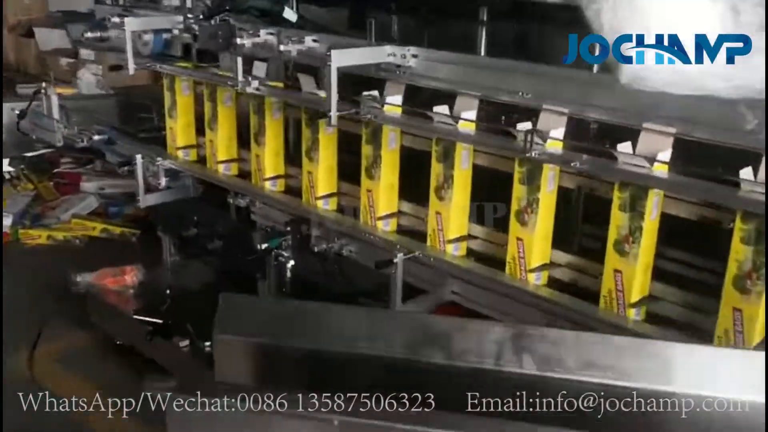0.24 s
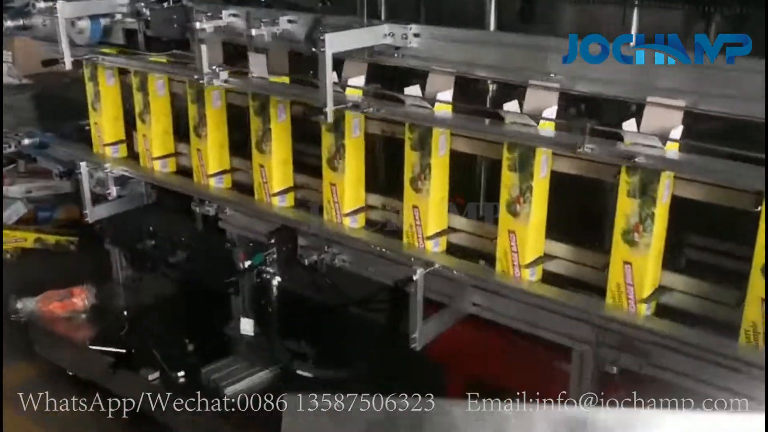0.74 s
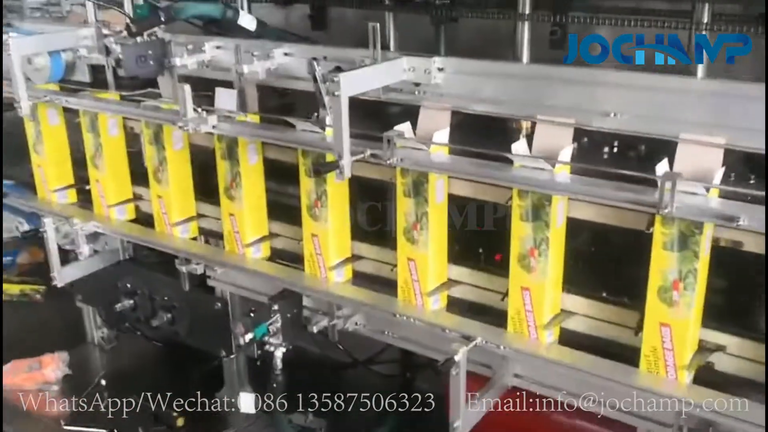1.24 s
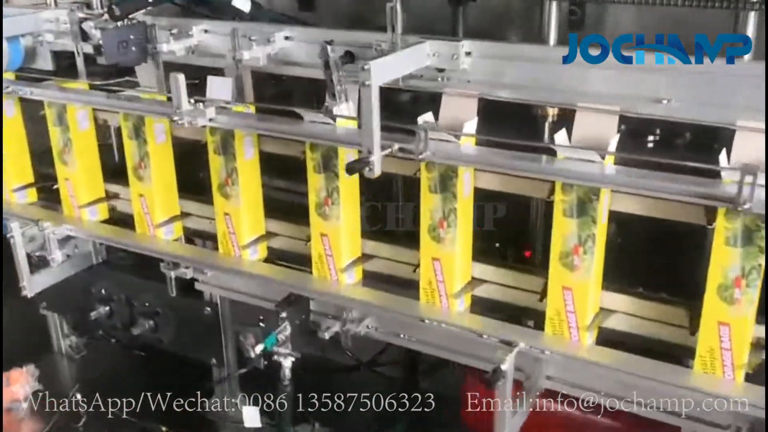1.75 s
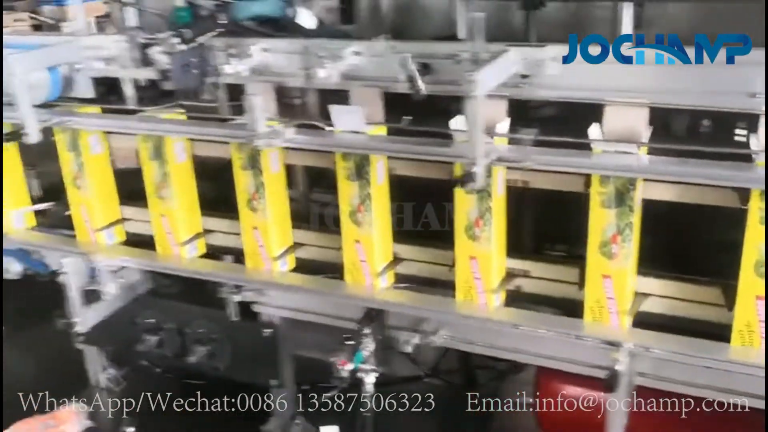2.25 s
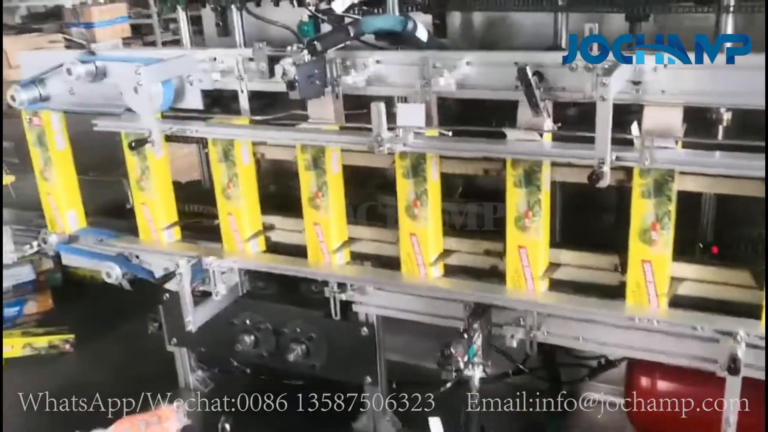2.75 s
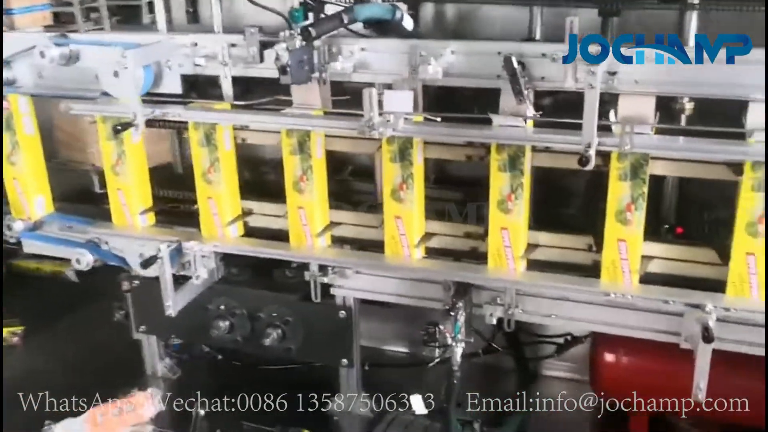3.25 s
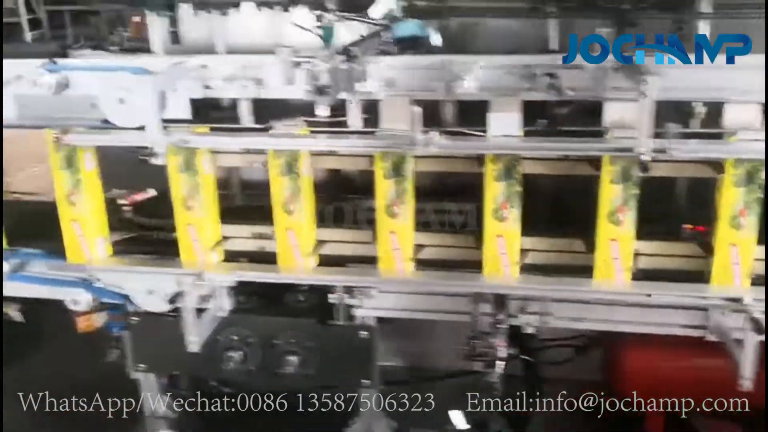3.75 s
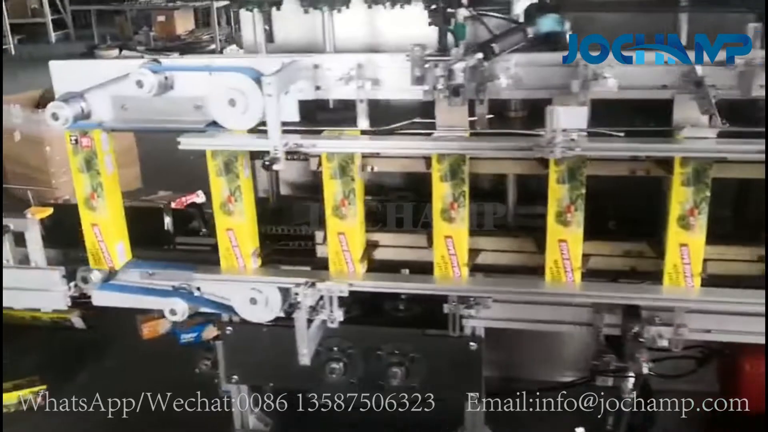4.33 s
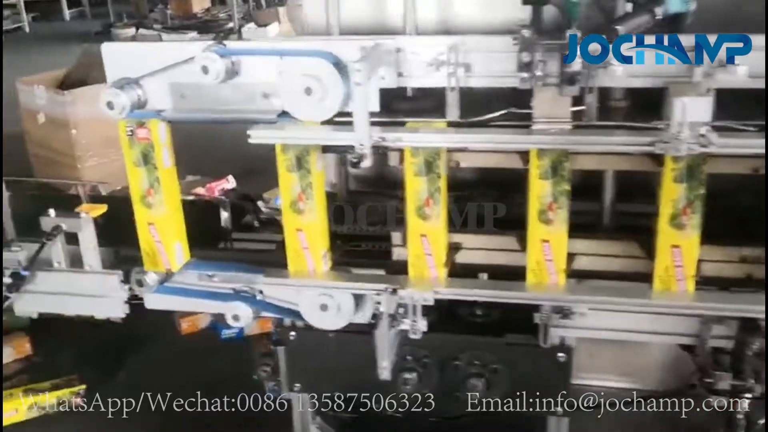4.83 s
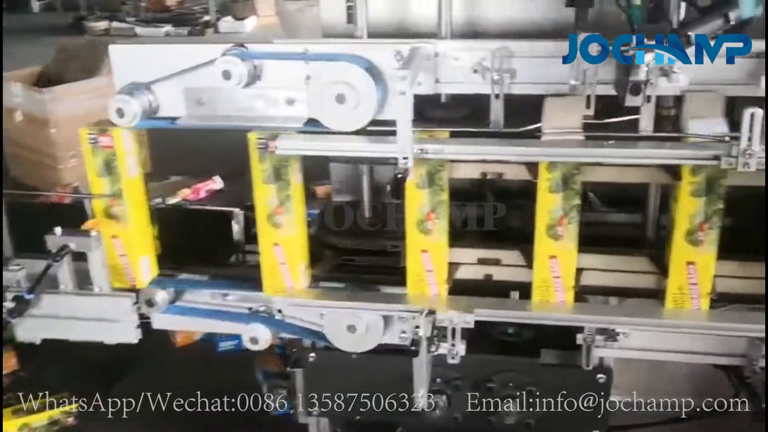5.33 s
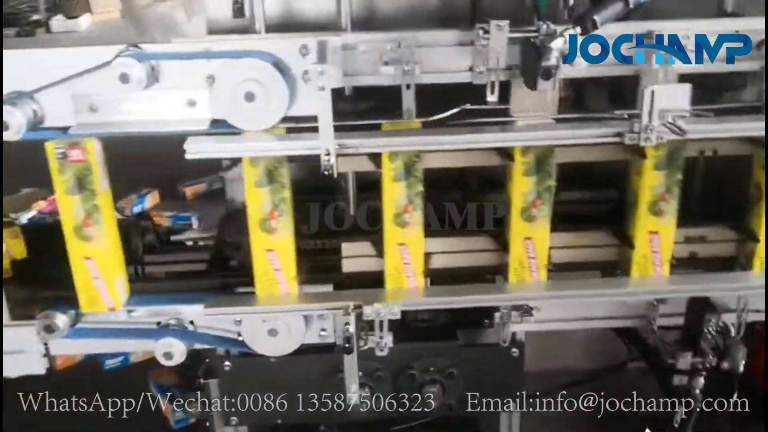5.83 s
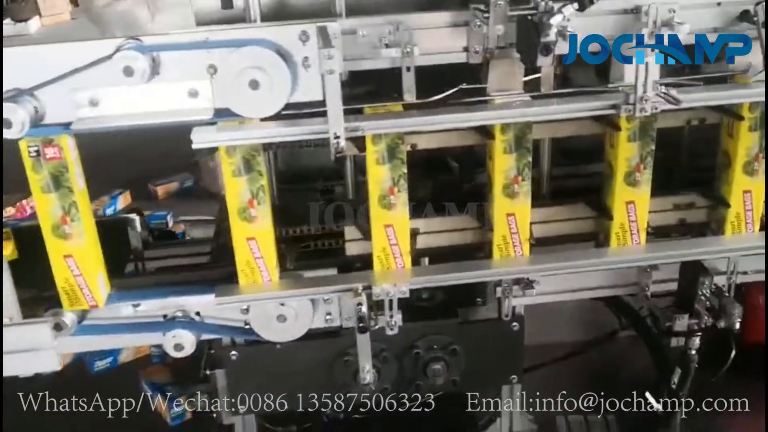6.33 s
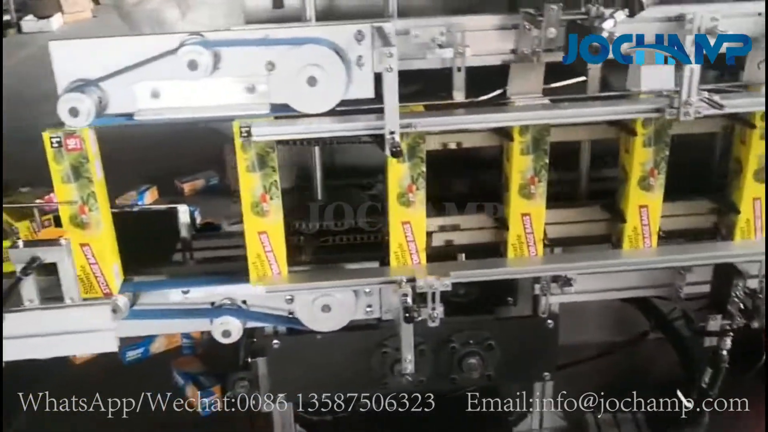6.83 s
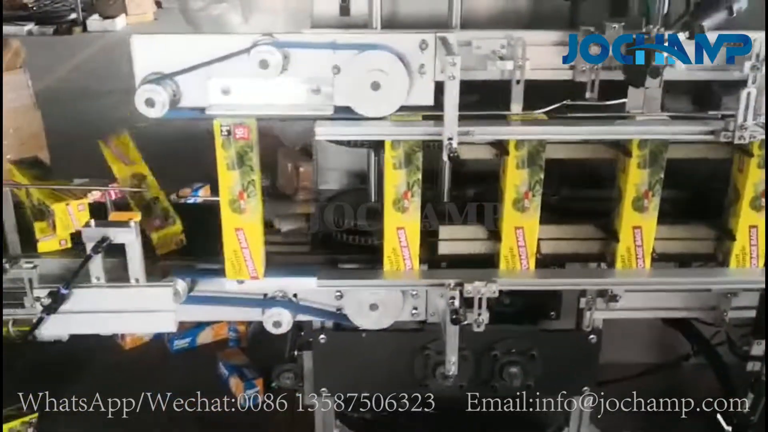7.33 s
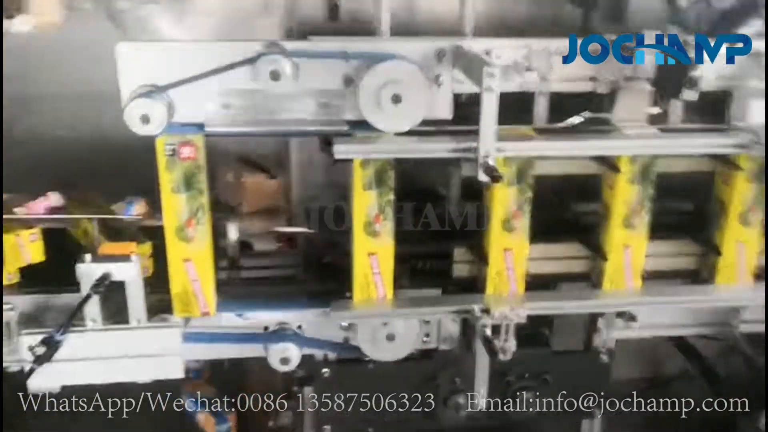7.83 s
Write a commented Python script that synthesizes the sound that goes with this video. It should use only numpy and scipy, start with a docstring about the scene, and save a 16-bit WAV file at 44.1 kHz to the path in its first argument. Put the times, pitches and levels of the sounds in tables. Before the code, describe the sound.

A packaging machine runs close to a phone in a factory hall. Every 1.6 seconds the drive rumbles and whines for about a second, chain rattling and cardboard boxes scraping and knocking on steel guides. Small metal clanks start many strokes; valves spit and exhausts whistle shortly after. Later strokes add a spluttering air jet ending in a metal clack. Motors and fans hum through the pauses.

```python
"""In a factory hall, a cartoning machine moves its conveyor on every 1.6 s, heard close by through a phone.
On each stroke the drive rumbles and whines (filtered grains of noise and steady tones), the chain rattles
and cartons scrape and knock along steel guides (noise through resonances).
Valves spit and exhausts whistle with short noise bursts; a jet blows as a cylinder clacks home.
Behind it all, wavering tones and coloured noise make motors and fans that carry on in the pauses."""
import sys
import numpy as np
from scipy import signal
from scipy.fft import rfft, irfft, next_fast_len
from scipy.io import wavfile

SR = 44100
rng = np.random.default_rng(int(sys.argv[2]) if len(sys.argv) > 2 else 0)


def transcribe(signal):
    """Save signal, clipped to [-1, 1], as a 16-bit WAV file at the path in sys.argv[1]."""
    frames = np.atleast_2d(signal).T
    limited = np.clip(frames, -1, 1)
    pcm = np.round(limited * 32767).astype(np.int16)
    wavfile.write(sys.argv[1], SR, pcm)


N = 356769
TIME = np.arange(N) / SR
SIZE = next_fast_len(N + SR)  # room for filters to ring out
FREQ = np.maximum(np.arange(SIZE // 2 + 1) * SR / SIZE, 1)

# conveyor strokes: (start [s], frame rumble [dB], starting lurch [dB], chain rattle [dB],
# carton scrape [dB], gear whine [dB])
STROKES = [(0.03, -31.5, -34, -35.5, -58, -42), (1.635, -32.5, -25.5, -34, -37, -38),
           (3.26, -30.5, -48, -33, -40.5, -39), (4.87, -31.5, -35.5, -34, -35, -41),
           (6.48, -30, -25.5, -32.5, -34, -41.5)]
# the motor pulls for RUN_S on every stroke; cartons are shoved hardest during SHOVE_S
RUN_S, SHOVE_S = 1, 0.5
DRIVE_HZ = 145.83


def undb(db):
    """Turn decibels into gain."""
    return 10 ** (np.asarray(db) / 20)


def unit(x):
    """Scale to an average strength (rms) of 1."""
    return x / np.sqrt(np.mean(np.abs(x) ** 2))


def noise():
    """Unrelated white noise for two channels."""
    return rng.standard_normal((2, N))


def walk(rate):
    """Random wandering of rms 1, in straight lines between new values drawn rate times a second."""
    steps = rng.standard_normal(4096)
    return unit(np.interp(TIME * rate, np.arange(len(steps)), steps))


def colour(points):
    """Frequency response through (frequency [Hz], level [dB]) points, reacting only after its input."""
    hz, db = np.transpose(points)
    gain = undb(np.interp(np.log(FREQ), np.log(hz), db))
    # folding the cepstrum (the spectrum of the log gain) forward in time makes the filter causal
    cepstrum = irfft(np.log(gain), SIZE)
    cepstrum[1:SIZE // 2] *= 2
    cepstrum[SIZE // 2 + 1:] = 0
    return np.exp(rfft(cepstrum))


def resonance(hz, width):
    """Frequency response of one way an object likes to vibrate (a mode); width in Hz."""
    return 1 / (1 + 1j * (FREQ / hz - hz / FREQ) * hz / width)


def through(x, response):
    """Filter a sound by a frequency response."""
    return irfft(rfft(x, SIZE) * response, SIZE)[..., :N]


def band(x, hz, q):
    """One resonance for a single event, scaled so that white noise keeps its level."""
    b, a = signal.iirpeak(min(hz, SR / 3), max(q, 1 / 2), fs=SR)
    return signal.lfilter(b, a, x) / np.sqrt(b[0])


def whistle(x, hz, width_hz):
    """Noise held in a steep, narrow resonance."""
    q = hz / width_hz
    twice = band(band(x, hz, q), hz, q)
    return twice / np.sqrt(SR / (np.pi * width_hz) / 2)


def decay(age, t60):
    """Fading that falls by 60 dB in t60 seconds."""
    return np.exp(-np.log(1000) * age / t60)


def burst(t60, crack=0):
    """Half a second of noise that dies away, with an extra crack in its first milliseconds."""
    age = TIME[:SR // 2]
    fade = decay(age, max(t60, 1e-3)) + crack * np.exp(-age / 0.002)
    return rng.standard_normal((2, len(age))) * fade / np.sqrt(1 + crack ** 2)


def ping(hz, t60):
    """Half a second of one mode ringing down, alike in both channels."""
    age = TIME[None, :SR // 2]
    return np.sin(2 * np.pi * hz * age) * decay(age, max(t60, 1e-3))


def onset(rise_s):
    """Half a second of gain that rises softly from 0 towards 1."""
    return 1 - np.exp(-TIME[:SR // 2] / rise_s)


def add(track, s, sound):
    """Mix a short sound in at time s."""
    start = max(int(s * SR), 0)
    track[:, start:start + sound.shape[1]] += sound[:, :N - start]


def grains(rate, scatter_db):
    """Dense tiny impacts at random moments; more scatter makes their sizes less equal."""
    size = undb(scatter_db * np.minimum(rng.exponential(size=N), 4))
    hits = rng.random(N) < rate / SR
    return unit(noise() * size * hits)


def room(x, early_db, tail_db, early_t60=0.16):
    """Quick reflections off the machine's panels, together with the longer tail of the hall."""
    age = TIME[:SR]
    hall_t60 = 0.56  # s
    early, tail = rng.standard_normal((2, 2, SR)) * (age > .002)
    early = unit(early * decay(age, early_t60))
    tail = unit(tail * decay(age, hall_t60) * (1 - np.exp(-age / 0.0076)))
    echoes = (undb(early_db) * early + undb(tail_db) * tail) / np.sqrt(SR)
    return x + through(x, rfft(echoes, SIZE))


def tone(hz, waver, drift_hz, rate):
    """A steady tone that drifts in pitch and wavers differently in each channel."""
    phase = 2 * np.pi * np.cumsum(hz + drift_hz * walk(6)) / SR
    channels = []
    for _ in range(2):
        strong = (1 + waver * walk(rate)) * np.sin(phase)
        channels.append(strong + waver * walk(rate) * np.cos(phase))
    return unit(np.array(channels))


def clatter(per_s, low_hz, high_hz, t60, scatter_db):
    """Many loose parts, each ringing briefly at its own pitch."""
    out, age = np.zeros((2, N)), TIME[:SR // 10]
    for when, pitch, size, turn in rng.random((int(per_s * N / SR), 4)):
        hz = low_hz * (high_hz / low_hz) ** pitch
        # the second channel starts elsewhere in the cycle
        swing = np.sin(2 * np.pi * (hz * age + np.array([[0], [turn]])))
        ring = swing * decay(age, t60) * (1 - np.exp(-age * hz))
        add(out, when * N / SR, undb(scatter_db * size) * ring)
    return unit(room(out, early_db=-13.0, tail_db=-2.0))


def stroke(levels_db, attack_s, hold_s, sag_db_per_s, release_db_per_s):
    """Gain over time: each stroke builds up, sags (or grows, if negative) while it runs, then dies away."""
    gain = 0
    for (start, *_), db in zip(STROKES, levels_db):
        age = np.maximum(TIME - start, 0)
        sag_db = sag_db_per_s * np.minimum(age, hold_s)
        release_db = release_db_per_s * np.maximum(age - hold_s, 0)
        gain = gain + np.minimum(age / attack_s, 1) ** 1.11 * undb(db - sag_db - release_db)
    return gain


def hall():
    """Fans and motors always run; one fan sinks as the drive pulls and the phone moves on; a bearing whirrs."""
    # colour of the hall's air: (frequency [Hz], level [dB])
    hall_colour = [(20, -23), (40, -7.5), (80, -7.5), (150, -3), (230, -7), (350, -12.5), (550, -20.5),
                   (780, -16), (1300, -16), (2100, -13.5), (2800, -15.5), (3600, -22), (6000, -39),
                   (9000, -104)]
    # colour of the high hiss: (frequency [Hz], level [dB])
    hiss_colour = [(3000, -25), (5500, -4), (7300, 0), (7900, -3), (8500, -21), (15000, -21)]
    # ducts and panels ringing: (frequency [Hz], width [Hz], level [dB])
    duct_modes = [(1930, 60, -10), (2320, 58, -7), (2740, 80, 1), (3070, 80, -8), (3700, 61, -1),
                  (4600, 200, -9)]
    # steady motors: (frequency [Hz], level [dB])
    motor_tones = [(100, -59.5), (146, -56), (167, -53.5), (300, -59), (336, -57.5), (1750, -56),
                   (2013, -56), (2277, -64), (3160, -56)]

    ducts = 1 + sum(undb(db) * resonance(hz, width) for hz, width, db in duct_modes)
    air = unit(through(noise(), colour(hall_colour) * ducts)) * undb(-40.5 + 1.7 * walk(6.1))
    hiss = unit(through(noise(), colour(hiss_colour))) * undb(-52.0)

    # the same short piece of noise comes back on every shaft turn
    shaft_hz = 24.15
    one_turn = (TIME % (1 / shaft_hz) * SR).astype(int)
    whirr = unit(through(noise()[:, one_turn], resonance(2170, 490) ** 2))
    whirr = whirr * undb(-49.5 + 0.53 * walk(15.0))
    hum = sum(undb(db) * tone(hz, waver=0.09, drift_hz=0.69, rate=6.6) for hz, db in motor_tones)

    load = stroke(np.zeros(len(STROKES)), attack_s=0.71, hold_s=1.22, sag_db_per_s=-3, release_db_per_s=38)
    # a steady fade of 0.55 dB per second, and a dip of 5 dB for each unit of load
    fan_db = -48.5 - .55 * TIME - 5 * load
    fan = undb(fan_db) * tone(815, waver=.15, drift_hz=.8, rate=5)
    return air + hiss + whirr + hum + fan


def drive():
    """The frame lurches as the chain takes up, then rumbles with its links and jolts; the motor drones."""
    # colour of the machine frame: (frequency [Hz], level [dB])
    frame_colour = [(20, -41.5), (45, -1), (65, -19.5), (85, 1), (102, -5), (135, 6.5), (185, 4.5),
                    (240, -0.5), (320, -3), (480, -12.5), (900, -71.5)]
    # the frame jolts and booms as the load shifts: (time [s], level [dB], frequency [Hz])
    jolt_events = [(0.715, -25.5, 139), (0.85, -23.5, 137.4), (2.65, -26, 142), (3.44, -27, 155),
                   (4.099, -34, 160), (5.071, -28, 159), (5.74, -24.5, 145), (6.969, -26.5, 188.5)]

    _, rumble_db, lurch_db, _, _, _ = np.transpose(STROKES)
    running = stroke(rumble_db, attack_s=0.19, hold_s=RUN_S, sag_db_per_s=0.65, release_db_per_s=30.5)
    lurch = stroke(lurch_db, attack_s=0.17, hold_s=SHOVE_S, sag_db_per_s=12.0, release_db_per_s=79)
    rumble = unit(through(grains(rate=1500, scatter_db=1), colour(frame_colour))) * np.hypot(running, lurch)
    motor = undb(-13) * running * tone(DRIVE_HZ, waver=0.69, drift_hz=1.66, rate=23)
    jolts = np.zeros((2, N))
    for s, db, hz in jolt_events:
        add(jolts, s, undb(db) * ping(hz, t60=0.23) * onset(0.0019))
    return rumble * undb(-2.0) + motor + jolts


def gearing():
    """Gears whine under load and sink in pitch as they coast; pressed hard, overtones near the ring sing."""
    # overtones of the gearing: (multiple of the drive frequency [-], level [dB])
    gear_orders = [(3, -15), (7, -14), (8, -12), (11, -7), (12, -1.5), (13, -10), (14, -17), (18, -21)]
    # the gearing sings out when it is pressed hardest: (start [s], length [s], level [dB])
    sing_events = [(0.53, 0.11, -36), (2.024, 0.63, -36.5), (7.335, .12, -39)]
    housing_hz, sing_width_hz = 1755, 170
    coast_db, coast_slowing = -46.5, .004  # whine left as gears run on; largest share of speed lost

    load = stroke(np.transpose(STROKES)[5], attack_s=0.335, hold_s=RUN_S,
                  sag_db_per_s=2.5, release_db_per_s=71.5)
    coast = stroke(np.full(len(STROKES), coast_db), attack_s=1.0, hold_s=RUN_S,
                   sag_db_per_s=-1, release_db_per_s=29)
    speed = 1 - coast_slowing * (1 - np.minimum(load / undb(-44), 1))

    press = 0
    for s, length, db in sing_events:
        edge = np.minimum(TIME - s, s + length - TIME)  # distance to the nearer end
        press = press + undb(db) * np.clip(edge / 0.023, 0, 1)
    press = press * undb(2.2 * walk(70))  # flutter
    whine = np.hypot(load * undb(1.6 * walk(11)), coast)

    gears = 0
    for k, db in gear_orders:
        nearness = 1 / np.hypot(1, (k * DRIVE_HZ - housing_hz) / sing_width_hz)
        overtone = tone(k * DRIVE_HZ * speed, waver=.28, drift_hz=4, rate=45)
        gears = gears + undb(db) * np.hypot(whine, press * nearness) * overtone
    housing = undb(-1.5) * unit(whistle(noise(), housing_hz, width_hz=66))
    return gears + housing * load


def clanks():
    """Small steel parts ring with a close pair of modes and a weaker overtone; brief bright clicks sound too."""
    # small steel parts clanking: (time [s], level [dB], frequency [Hz], 60 dB decay [s])
    clank_events = [(0.1321, -9.5, 2065, 0.026), (0.166, -20, 789, 0.11), (0.23, -25.5, 1160, .2),
                    (0.265, -29.5, 1150, 0.52), (1.729, -18, 2340, 0.1), (1.784, -24, 2260, 0.12),
                    (1.803, -17, 2290, 0.1), (1.879, -19, 2620, 0.079), (1.955, -31, 1895, 0.19),
                    (2.456, -18.5, 2750, 0.044), (2.68, -26, 2120, 0.1), (2.694, -25, 2440, .1),
                    (3.392, -22, 1640, 0.045), (3.415, -18, 1270, .06), (4.894, -25, 1650, 0.046),
                    (4.989, -18.5, 1670, 0.086), (5.02, -23, 1156, 0.13), (6.559, -24, 2170, 0.1),
                    (6.612, -19, 1510, 0.055), (6.666, -15.5, 2280, 0.058)]
    # brief bright clicks of noise: (time [s], level [dB], frequency [Hz], 60 dB decay [s])
    click_events = [(0.1322, -17, 3500, .022), (3.472, -41, 12000, .008), (5.5355, -22, 4500, .028)]

    out = np.zeros((2, N))
    contact = onset(0.00046)
    for s, db, hz, t60 in clank_events:
        partner = undb(2) * ping(1.07 * hz, t60 / 2)
        overtone = undb(-27) * ping(2.0 * hz, t60 / 2)
        add(out, s, undb(db) * contact * (ping(hz, t60) + partner + overtone))
    for s, db, hz, t60 in click_events:
        add(out, s, undb(db) * whistle(burst(t60), hz, width_hz=.8 * hz))
    return undb(-5.0) * room(out, early_db=-16.5, tail_db=-6.5)


def conveyor(steel):
    """The chain rattles in its steel guides while cardboard rubs along them and now and then squeaks."""
    # colour of the chain: (frequency [Hz], level [dB])
    chain_colour = [(200, -11.5), (400, -9.5), (560, 0), (760, 0), (1200, -6.5), (1700, 1.5), (2300, -28.5),
                    (4000, -6), (8000, -55)]
    # colour of rubbing cardboard: (frequency [Hz], level [dB])
    card_colour = [(900, -25), (1600, 3), (2200, 10), (2800, -6), (3800, 2), (5000, 0.5), (7500, 1.5),
                   (8600, -124), (15000, -20)]
    # cardboard squeaking on the guides: (time [s], level [dB], frequency [Hz], 60 dB decay [s],
    # width [Hz], swelling time [s])
    squeak_events = [(2.674, -35, 2150, 0.095, 370, 0.0055), (5.908, -32.5, 2290, 0.15, 420, 0.027),
                     (6.556, -57, 6930, 0.64, 110, .005), (6.664, -42, 7050, 0.07, 130, .002),
                     (6.718, -46, 6860, 0.051, 110, .003)]

    _, _, _, rattle_db, scrape_db, _ = np.transpose(STROKES)
    shake = stroke(rattle_db, attack_s=0.11, hold_s=RUN_S, sag_db_per_s=7.0, release_db_per_s=42)
    shove = stroke(scrape_db, attack_s=0.21, hold_s=SHOVE_S, sag_db_per_s=6.5, release_db_per_s=24)
    # cartons slide under the shove and on after it
    slide = stroke(np.full(len(STROKES), -40.5), attack_s=0.02, hold_s=1.0,
                   sag_db_per_s=6.5, release_db_per_s=80)
    rub = np.sqrt(shove ** 2 + slide ** 2 + undb(-45.0) ** 2)  # the belts keep rubbing in the pauses

    rattle = through(grains(rate=700, scatter_db=1.5), colour(chain_colour) * steel)
    rattle = unit(room(rattle, early_db=6.5, tail_db=1)) * shake * undb(1.5 + 1.68 * walk(35))
    scrape = through(grains(rate=1500, scatter_db=0.0), colour(card_colour) * steel)
    scrape = unit(room(scrape, early_db=0.0, tail_db=-5.5)) * rub * undb(1 + 1.7 * walk(45))

    # loose parts chatter mostly when the chain shakes hard
    loose = clatter(per_s=750, low_hz=750, high_hz=3200, t60=.032, scatter_db=18)
    loose = loose * shake * (shake / shake.max()) ** 1.3 * undb(1.5)

    squeaks = np.zeros((2, N))
    for s, db, hz, t60, width, swell_s in squeak_events:
        add(squeaks, s, undb(db) * whistle(burst(t60), hz, width) * onset(swell_s))
    return rattle + scrape + loose + room(undb(13.0) * squeaks, early_db=-26, tail_db=-15)


def pneumatics():
    """Valves spit, the jet coughs, snaps open and cuts off, and each exhaust pops and whistles in its port."""
    # valves switching: (time [s], level [dB], 60 dB decay [s])
    valve_events = [(0.342, -26.5, 0.15), (0.834, -27.5, 0.1), (0.884, -31.5, 0.22), (1.9576, -20, 0.1),
                    (2.4548, -28, 0.26), (3.5383, -25, 0.11), (4.0062, -30, 0.39), (4.056, -25, 0.14),
                    (4.107, -26, 0.16), (5.137, -25, 0.075), (5.68, -25, 0.094), (5.7358, -27, 0.063),
                    (6.756, -29, 0.065), (7.255, -27.5, 0.26), (7.307, -24.5, 0.16), (7.3618, -27.5, 0.087)]
    # cylinders venting: (time [s], level [dB], whistle frequency [Hz], whistle over the hiss [dB],
    # opening time [s])
    exhaust_events = [(0.493, -14, 7200, -5, 0.0077), (0.985, -11.5, 7300, -8.5, 0.0064),
                      (2.113, -15.5, 7060, -5.5, 0.0016), (2.606, -14, 7240, -6.5, 0.0018),
                      (4.206, -13.5, 7100, -7, 0.00098), (5.8319, -18.5, 7640, -6, 0.000086),
                      (7.4598, -17, 7100, 2, .0001)]
    # the air jet: (time [s], length [s], level [dB], time until the nozzle is fully open [s])
    jet_events = [(3.537, 0.23, -31, 0.02), (5.143, 0.18, -28.5, 0.016), (6.759, 0.2, -29, 0.024)]
    # resonances of the jet's nozzle: (frequency [Hz], width [Hz], level [dB])
    nozzle_modes = [(2330, 300, -7), (3100, 250, -6), (3750, 300, -5), (6120, 260, 10), (7450, 500, -5),
                    (8800, 250, 4), (9250, 300, 5)]
    # colours of the jet, a valve's spit and a vent's hiss: (frequency [Hz], level [dB])
    air_colour = [(300, -22.5), (750, 4.5), (1200, 0.5), (2500, 7), (3600, -1), (5500, -2.5), (6100, -6.5),
                  (6700, 1), (7800, 4.5), (8400, -10), (9400, -17), (10500, -22), (13000, -8.5),
                  (15000, -14)]
    spit_colour = [(500, -4), (2000, 11), (3000, 5.5), (5000, 1.5), (7900, 3), (8600, -22), (11000, -15),
                   (15000, -15.5)]
    vent_colour = [(500, -4.5), (2000, 7), (3500, -1.5), (6000, -4), (7900, 4), (8700, -27.5), (10000, -16),
                   (12000, -9), (15000, -17)]
    splutter_db = 3.2

    spit, vent, jet, ring = np.zeros((4, 2, N))
    for s, db, t60 in valve_events:
        add(spit, s, undb(db - 3.5) * burst(t60, crack=0.14))
    for s, db, hz, whistle_db, open_s in exhaust_events:
        opening = onset(open_s)
        add(vent, s, undb(db - 7.0) * burst(t60=0.066, crack=0.69) * opening)
        port = whistle(burst(t60=.12, crack=1) * opening, hz, width_hz=650)
        add(ring, s, undb(db + whistle_db - 6) * port)
    for s, length, db, open_s in jet_events:
        age = TIME[:int(length * SR)]
        add(ring, s, undb(db + 1.5) * whistle(burst(t60=.19), 3300, width_hz=1200))
        flow = np.minimum(.15 + (age / open_s) ** 4, 1)
        add(jet, s, undb(db + 1) * flow * noise()[:, :len(age)])

    # the flow splutters, and each resonance of the nozzle flares up on its own
    jet = jet * undb(splutter_db * walk(110))
    flares = 0
    for hz, width, db in nozzle_modes:
        flares = flares + through(jet * undb(db + splutter_db * walk(40)), resonance(hz, width))
    jet = undb(-2) * through(jet + flares, unit(colour(air_colour)))
    puffs = through(spit, unit(colour(spit_colour))) + through(vent, unit(colour(vent_colour))) + ring
    return room(puffs, early_db=-3.0, tail_db=-1.5) + room(undb(-0.9) * jet, early_db=-5.5, tail_db=-1.5)


def pusher(steel):
    """Metal meets metal at the end of the push and the frame thumps."""
    # the pusher hits its stop: (time [s], clack level [dB], thump level [dB])
    stop_events = [(3.7382, -16, -22.5), (5.3412, -17, -23), (6.968, -16.5, -30)]
    # colour of the clack: (frequency [Hz], level [dB])
    clack_colour = [(200, 9), (700, -10.5), (1400, 1), (2000, 3.5), (3000, 3), (5000, -0.5), (7800, 5.5),
                    (8600, -18), (15000, -15)]

    clack, thump = np.zeros((2, 2, N))
    for s, db, thump_db in stop_events:
        add(clack, s, undb(db) * burst(t60=0.063, crack=0.26))
        add(thump, s, undb(thump_db) * whistle(burst(t60=0.06)[:1], 110, width_hz=260))
    clack = undb(1.5) * through(clack, unit(colour(clack_colour) * steel))
    return room(clack, early_db=-7.5, tail_db=-2) + thump


def cartons():
    """Hollow boxes knock on guides, drop off the end and bounce once; direct sound is alike in both channels."""
    # cartons slapping the guides, and at 0.369 s the pusher thumping: (time [s], level [dB], centre frequency
    # [Hz], 60 dB decay [s], # thump level [dB], crack over ring [ratio])
    knock_events = [(0.1325, -7, 1960, 0.03, -24.5, .3), (0.166, -14.5, 930, 0.06, -32, .15),
                    (0.369, -20.5, 695, 0.16, -22, .3), (1.062, -16, 2150, 0.037, -30, .1),
                    (1.745, -15, 1000, 0.061, -23, .1), (1.838, -12, 1750, 0.038, -48, .1),
                    (1.995, -17, 750, 0.038, -40, .2), (2.502, -16, 1770, 0.041, -44, .1),
                    (3.389, -13, 1640, 0.041, -36, 0.05), (3.412, -12, 2200, 0.023, -48, .1),
                    (3.416, -11.5, 1220, 0.035, -48, .1), (3.436, -22, 1150, .06, -36, .1),
                    (3.514, -31, 1740, 0.034, -50, .3), (3.613, -21.5, 840, 0.11, -45, .1),
                    (4.894, -22, 1800, 0.042, -55, .3), (4.989, -11, 1630, 0.078, -32.5, .2),
                    (5.739, -19, 1780, 0.049, -47, .2), (6.609, -12, 990, 0.049, -36, .2),
                    (6.64, -15, 2140, 0.049, -38, .3), (6.666, -14, 2320, 0.076, -25, .3)]
    # cartons dropping off the end of the belt: (time [s], level [dB], pitch over the usual [ratio])
    drop_events = [(4.008, -19.5, 1.21), (5.5355, -16, .88), (7.255, -12.5, 1.0)]
    # modes of the hollow box: (frequency [Hz], level [dB], 60 dB decay [s])
    box_modes = [(188, -12.5, 0.2), (320, -11, 0.1), (440, -12, 0.083), (680, -1.5, 0.1), (995, -1.5, 0.1),
                 (1525, -7, .05)]
    bounce_s, bounce_db = .0195, -6.5

    out = np.zeros((2, N))
    for s, db, hz, t60, thump_db, crack in knock_events:
        add(out, s, undb(db) * band(burst(t60, crack)[:1], hz, q=2.4))
        add(out, s, undb(thump_db) * whistle(burst(t60=0.081)[:1], 140, width_hz=570))
    for s, db, pitch in drop_events:
        body = 0
        for k, (hz, mode_db, t60) in enumerate(box_modes):
            body = body + (-1) ** k * undb(mode_db) * ping(pitch * hz, t60)  # every other mode upside down
        for delay, change_db in (0, 0), (bounce_s, bounce_db):
            slap = band(burst(t60=0.071, crack=0.59)[:1], 700, q=0.99)
            add(out, s + delay, undb(db + change_db) * (body + slap))
    soft = colour([(150, -3.5), (3800, -4), (5500, -22.0), (7800, -12), (8800, -33)])
    return undb(-4.5) * room(through(out, soft), early_db=-10.0, tail_db=-3)


def microphones(x, aside):
    """Two close microphones share the bass, the left later for a source aside (0-1); treble is diffuse."""
    # sound that differs between the microphones, against what they share: (frequency [Hz], level [dB])
    width_points = [(30, -32), (70, -25), (150, -20), (280, -9), (480, -3), (1000, -2), (2000, 0)]
    # how far the left trails the right for a source fully aside: (frequency [Hz], lag [radians])
    lag_points = [(30, 0.07), (150, 0.28), (340, 0.6), (600, 2.5), (1100, 4.7), (1750, 5.6)]
    # left over right: (frequency [Hz], level [dB])
    lean_points = [(300, 0), (560, -3), (1100, -0.5), (2300, 2.5), (4400, -3.5), (8000, 2), (13000, 0)]

    apart = np.abs(colour(width_points))
    lean = np.sqrt(np.abs(colour(lean_points)))  # half of the lean for each side
    norm = np.sqrt(2 * (1 + apart ** 2))
    mid = through(x[0] + x[1], 1 / norm)
    side = through(x[0] - x[1], apart / norm)
    lag = aside * np.interp(FREQ, *np.transpose(lag_points))
    left = through(mid + side, lean * np.exp(-1j * lag))
    right = through(mid - side, 1 / lean)
    return np.array([left, right])


def scene():
    """The body of the machine stands to the right; cartons, clanks and the hall lie more nearly ahead."""
    # steel guides and frame: (frequency [Hz], width [Hz], level [dB])
    steel_modes = [(680, 8.5, -35), (850, 150, 1), (1036, 21, 4), (1133, 140, 6.5), (1800, 120, -4.5),
                   (1930, 840, 0.5), (2370, 36, 2.5), (2670, 32, 12), (3200, 32, -4), (3650, 98, -20)]
    steel = 1 + 1.12 * sum(undb(db) * resonance(hz, width) for hz, width, db in steel_modes)
    machine = drive() + gearing() + conveyor(steel) + pusher(steel) + pneumatics()
    return microphones(machine, aside=1) + microphones(hall() + cartons() + clanks(), aside=.35)


def record(dry):
    """The phone cuts the top: a steep filter removes what lies above 15200 Hz."""
    low_pass = signal.ellip(8, .2, 70, 15200, fs=SR, output="sos")
    return signal.sosfilt(low_pass, dry)


dry = scene()
out = record(dry)
transcribe(out)
```